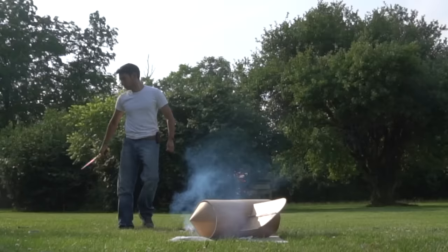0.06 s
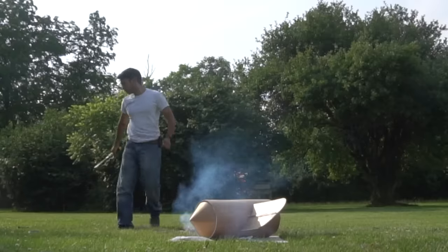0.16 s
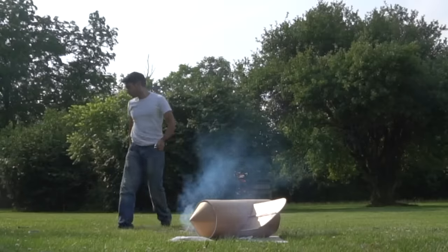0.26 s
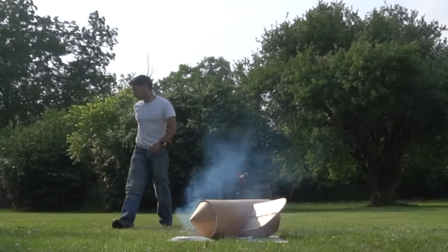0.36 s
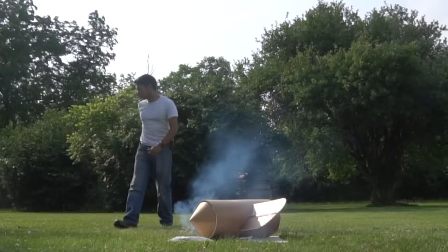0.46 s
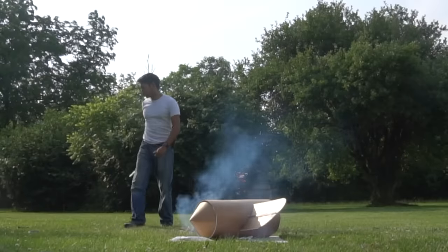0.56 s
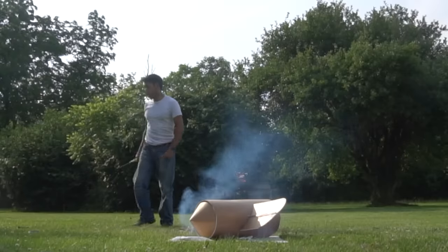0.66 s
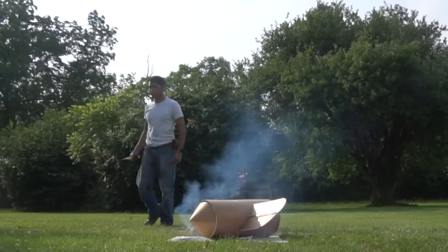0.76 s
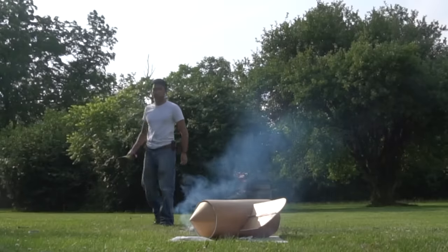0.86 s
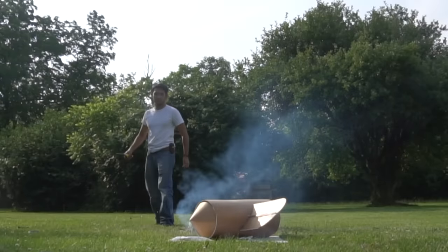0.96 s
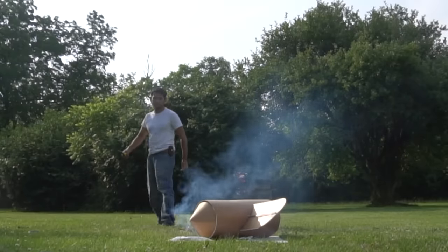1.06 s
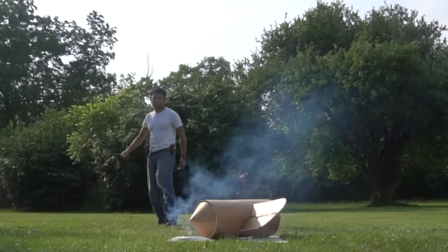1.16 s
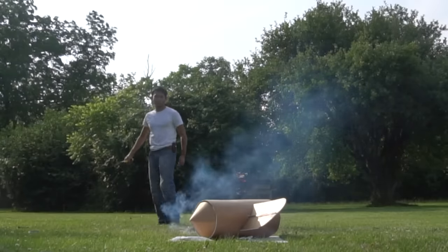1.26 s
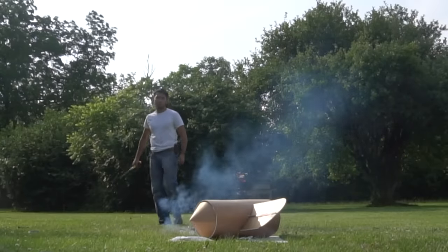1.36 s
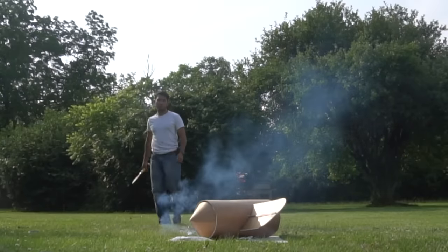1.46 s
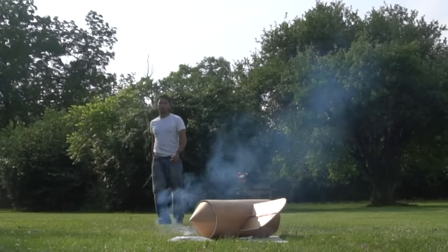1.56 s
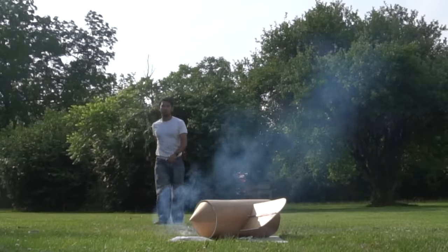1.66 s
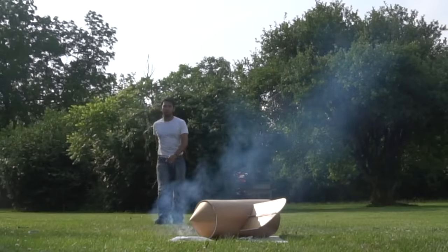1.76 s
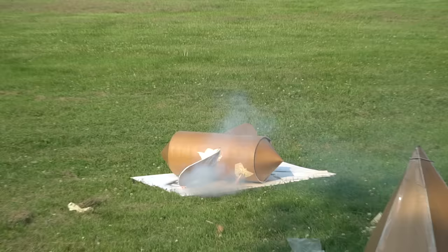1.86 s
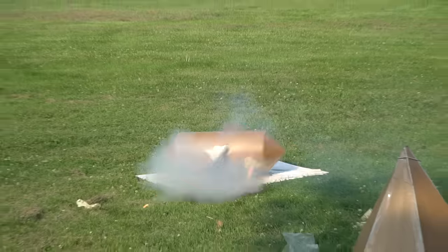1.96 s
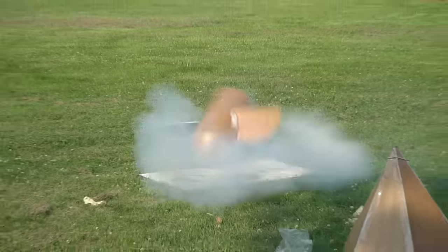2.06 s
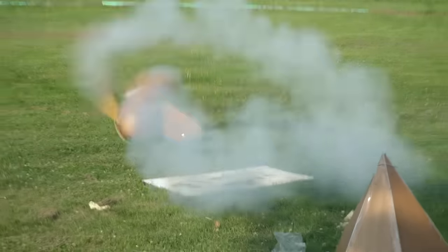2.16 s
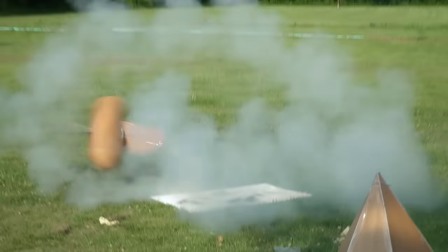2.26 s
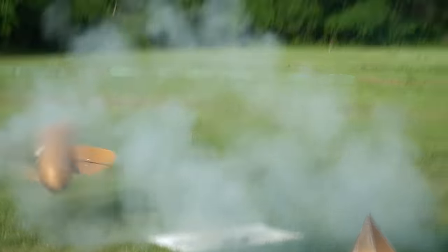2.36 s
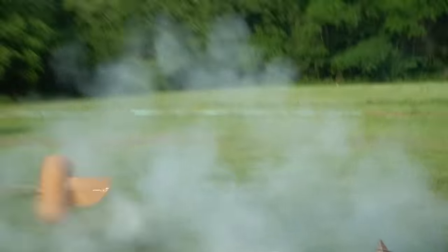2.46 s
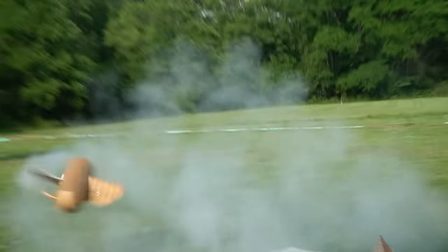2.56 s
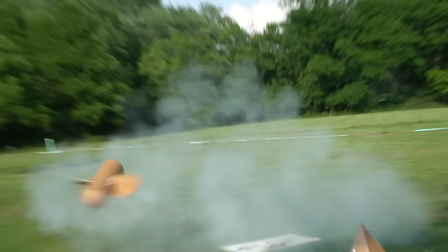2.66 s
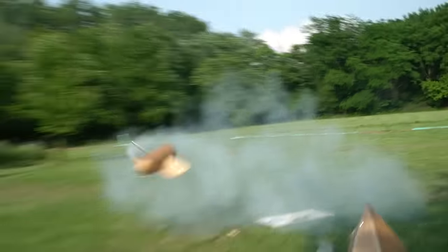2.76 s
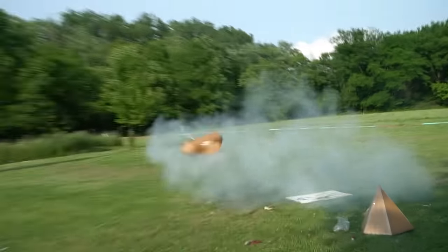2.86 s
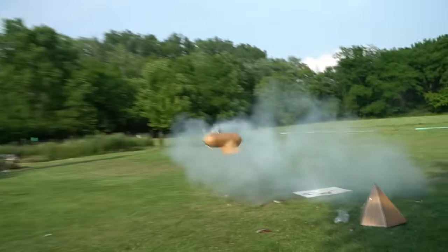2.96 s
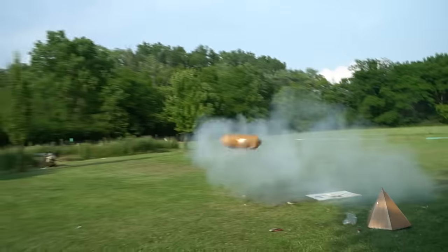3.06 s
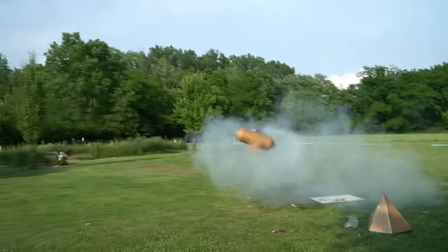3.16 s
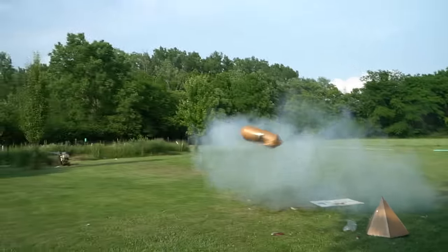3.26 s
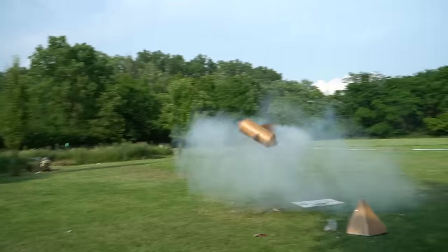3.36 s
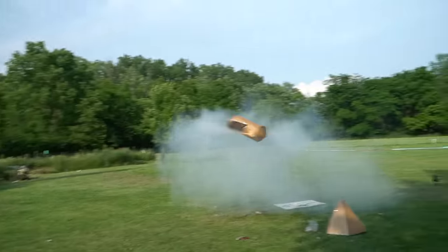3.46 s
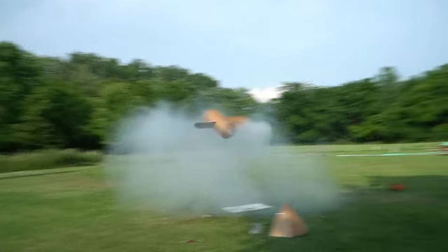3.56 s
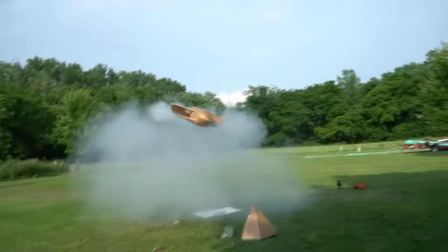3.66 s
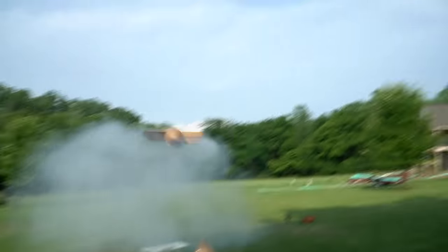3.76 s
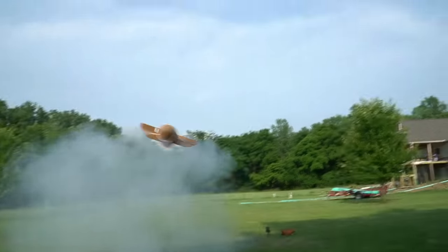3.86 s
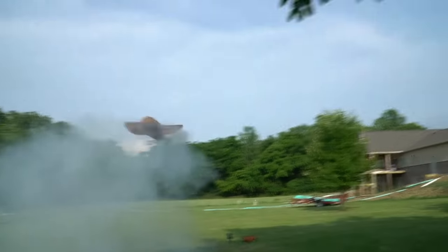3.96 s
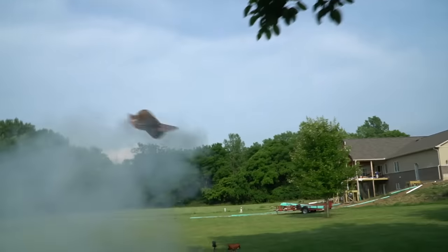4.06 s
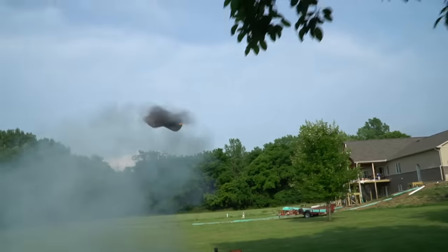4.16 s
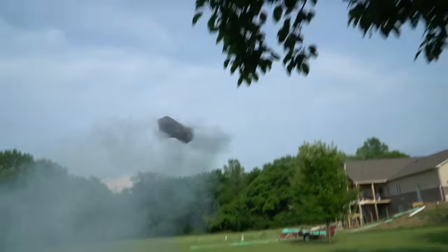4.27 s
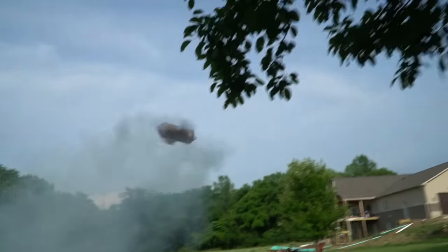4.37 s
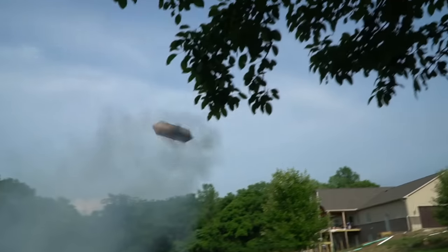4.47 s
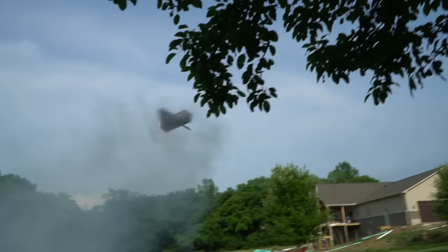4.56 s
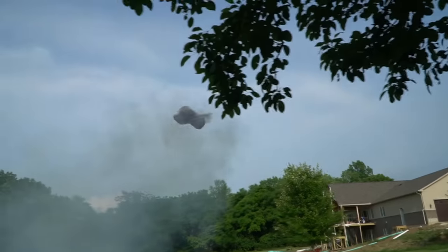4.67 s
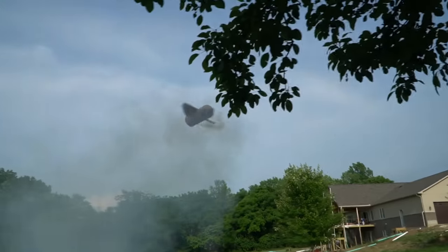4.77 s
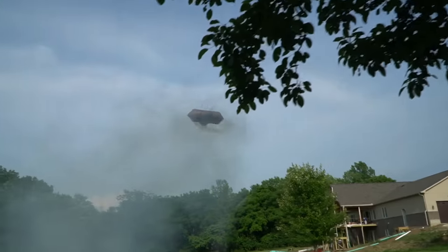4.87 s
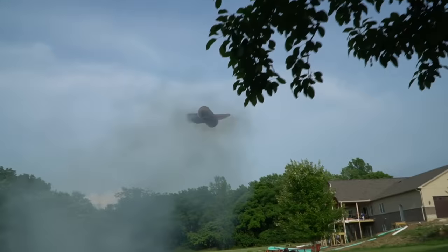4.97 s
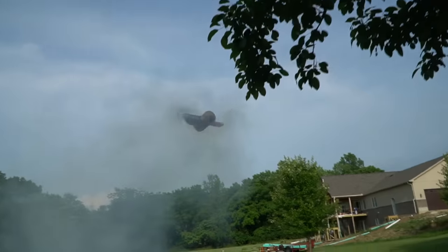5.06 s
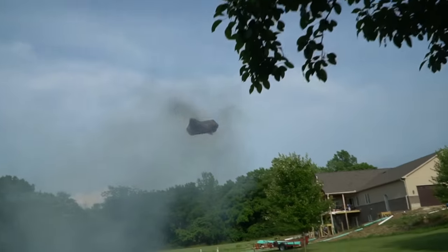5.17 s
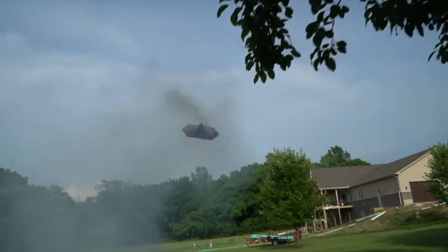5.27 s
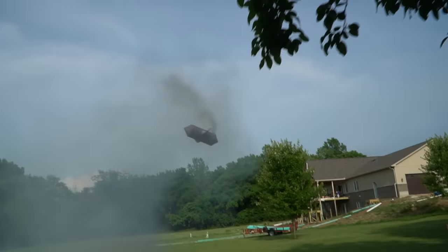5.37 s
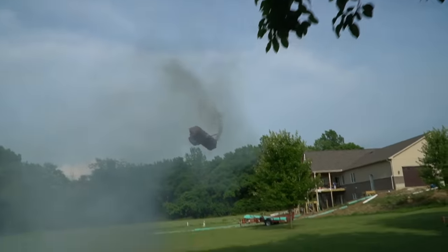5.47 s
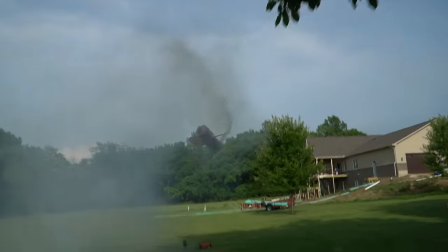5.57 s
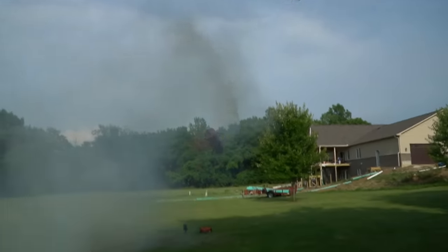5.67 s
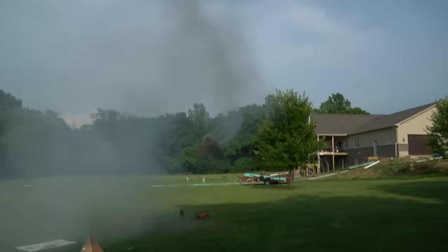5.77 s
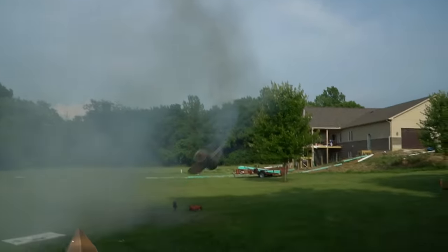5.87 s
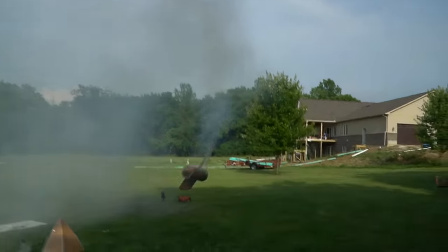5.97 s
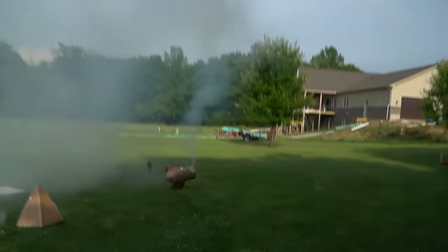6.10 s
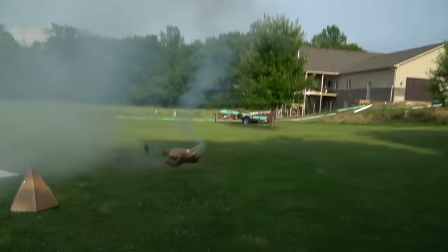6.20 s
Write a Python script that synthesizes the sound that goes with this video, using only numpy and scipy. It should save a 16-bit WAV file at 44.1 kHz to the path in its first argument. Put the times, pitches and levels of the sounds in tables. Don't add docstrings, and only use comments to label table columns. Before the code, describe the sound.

Quiet sputtering and low wind bumps jump abruptly to a loud, crackling jet roar whooshing round about five times a second, then faint hiss and a thud.

```python
import sys
import numpy as np
from scipy import signal
from scipy.io import wavfile
from scipy.ndimage import uniform_filter1d, map_coordinates

SR = 44100
rng = np.random.default_rng(int(sys.argv[2]) if len(sys.argv) > 2 else 0)


def field_ratio(decibels):
    return 10 ** (np.asarray(decibels, dtype=float) / 20)


def output_pcm(signal):
    pcm = np.clip(np.atleast_2d(signal).T, -1, 1) * 32767
    wavfile.write(sys.argv[1], SR, np.round(pcm).astype(np.int16))


N = 274910
T = np.arange(N) / SR
CUT_S, BURNOUT_S = 1.942, 4.517

# [t/s, level/dB, brightness/dB]
FUSE_BURN = [(0.03, -42.5, 1), (0.23, -44.5, 2.5), (0.36, -45.5, -2), (0.6, -45.5, 0.5), (0.76, -44.5, 1),
             (1.0, -46, -5), (1.33, -45.5, -1.5), (1.62, -48, -3.5), (1.9, -48.5, -2)]
# [f/Hz, level/dB per Hz]
FUSE_SPECTRUM = [(120, -3), (200, -4), (554, -2.5), (630, -3.5), (1280, -4), (1540, -2.5), (1780, -5),
                 (2800, -7.5), (3480, -8.5), (5300, -11.5), (6590, -17.5), (8050, -13.5), (10800, -21.5),
                 (13600, -14.5), (15500, -20)]
# [t/s, f/Hz, level/dB]
FUSE_COLOUR = [(0, 4700, 6), (.24, 4800, 7), (.33, 4200, -5), (.52, 3550, 3), (.84, 3600, 8),
               (.95, 4000, 0), (1.2, 4520, 2.5), (1.5, 4400, 2), (1.9, 4300, -8)]
# [t/s, lag/ms]
FUSE_LAG = [(0, 0.79), (.22, 0.85), (.32, 1.12), (.55, 1.14), (.85, 1.2), (1.0, 1.22), (1.3, 1.22),
            (1.94, 1.2)]
# [t/s, length/s, f/Hz, level/dB]
FLARES_BY_BURN = [
    [(.1, 0.16, 7240, 2), (.46, 0.054, 12500, 5), (.62, .12, 13500, 2), (.78, .07, 5970, 6.5), (.92, .04, 7500, 6.5), (1.3, 0.29, 8200, 5), (1.3, .2, 12800, 1.5)],
    [(4.7, 0.019, 12000, 4), (4.78, .03, 13000, 9), (5.13, 0.036, 7500, 2), (5.32, .08, 8000, 4.5), (5.58, 0.09, 8700, 8), (5.67, 0.035, 12500, 9), (5.92, .08, 8500, 2.5), (6.18, 0.033, 10900, 7)],
]
# [t/s, peak level/dB, centre f/Hz, length/ms]
SPIT_EVENTS = [
    (.012, -38, 497, 4.5),
    (.2, -39, 800, 4),
    (.327, -44, 9000, 4.2),
    (.405, -34, 546, 4.2),
    (.452, -34, 7350, 3),
    (.517, -33, 450, 4),
    (.612, -33, 580, 5.2),
    (1.979, -20, 4000, 1.2),
    (1.985, -13, 3540, 1.1),
    (5.228, -52, 900, 5.4),
]
# [t/s, peak level/dB, length/s]
GUSTS = [
    [(0.0, -29, 0.092), (.58, -33, 0.12), (.78, -30, 0.11), (.99, -24, 0.068), (1.15, -22, 0.075), (1.3, -26, 0.1), (1.43, -28, 0.018), (1.53, -28, 0.021), (1.74, -30, 0.081), (1.93, -39.5, 0.069)],
    [(5.08, -56, 0.073), (5.64, -50, 0.052), (5.83, -48, 0.056), (5.92, -43, 0.089), (6.12, -53, .04), (4.8, -48, 0.15)],
]
# [f/Hz, level/dB per Hz]
GUST_SPECTRA = [
    [(2.9, -32), (5.0, 8.5), (21, -6), (82, -19), (154, -26.5), (300, -31.5), (390, -58), (660, -120)],
    [(2.9, -34), (5.0, 5.5), (21, 0.5), (48, -13), (75, -11), (195, -24), (228, -26), (257, -34), (300, -26.5), (390, -57), (660, -120)],
]
# [f/Hz, level/dB per Hz]
JET_SPECTRUM = [(130, -44), (220, -14), (320, -7.5), (663, -4.5), (882, -6.5), (1300, -5.5), (1450, -1.5),
                (2000, 0), (2190, -2.5), (3180, -1), (6590, -5.5), (8770, -1), (10500, -10), (13900, -7),
                (15500, -14.5)]
# [place/turns, width/turns, level/dB, strongest f/Hz, slant/turns per octave]
BEAM_LOBES = [
    (0.01, 0.089, 11.5, 5530, -0.028),
    (0.283, 0.064, 5, 3700, 0.012),
    (0.828, 0.078, 1.7, 2090, 0.0066),
    (0.941, 0.016, -0.5, 5300, 0.0045),
    (.13, 0.068, 2.5, 1100, 0.013),
    (.43, .1, -5.5, 2800, -0.025),
]
# [t/s, f/Hz, level/dB]
LAUNCH_COLOUR = [(1.95, 5240, 5.5), (2.015, 4700, 7.5), (2.045, 1290, 2.5), (2.09, 995, 5.5),
                 (2.13, 800, -2.5), (2.15, 4470, 2.5), (2.23, 1900, 3), (2.3, 3170, 0.5), (2.39, 2300, 9.5)]
# [t/s, f/Hz, level/dB]
SHEET_CANCEL = [(1.95, 2600, -11), (2.03, 2550, -10), (2.08, 3300, -9), (2.125, 4150, -7), (2.14, 4400, -.1)]
# [t/s, place/turns, thrust/dB, brightness/dB per octave]
BREAK_LOOSE = [
    (1.942, -1.3, -9, 0.7),
    (1.975, -1.25, -4.5, 0.5),
    (2.01, -1.24, 1, 1.5),
    (2.09, -1.13, 1.5, -0.5),
    (2.126, -1.164, 2.2, -4.5),
]
# [t/s, level/dB, brightness/dB per octave, side lobe delay/s, side lobe level/dB]
SWEEPS = [(2.165, 3, -1.5, 0.079, -2), (2.32, -1.3, 0.7, 0.035, -1), (2.523, -1.2, 1.5, 0.045, 2.2),
          (2.73, -0.2, 0.4, 0.05, -0.2), (2.94, -1.8, 1.3, 0.057, 2), (3.153, 0.2, 0.5, 0.064, -0.5),
          (3.359, -2.2, -0.2, 0.086, -1.7), (3.576, 0.1, 0.8, 0.079, -0.8), (3.798, 1, 0.4, 0.07, -0.2),
          (4.009, 0.8, 1, .073, -0.7), (4.228, 1.1, 2.5, .069, 0), (4.443, 1.8, 3.8, 0.056, 6)]
# [t/s, lag/ms]
GRASS_LAG = [(1.94, 0.047), (2.2, 0.16), (2.65, 1.04), (3.2, 1.63), (3.76, 2.8), (4.32, 3.64), (4.55, 4.44),
             (5.1, 4.4), (5.43, 4.12), (5.71, 2.95), (6.24, 0.61)]
# [t/s, peak level/dB, direction/1, length/ms]
POP_EVENTS = [(2.182, -34, 1, 2.6), (2.434, -36, 0.81, 10), (2.518, -31.5, 0.71, 3.6),
              (2.951, -31, 0.52, 2.6), (3.143, -58, 0.85, 6.9), (3.365, -22.5, -1.5, 2), (3.9, -44, 1, 19),
              (4.014, -26, 1, 2.8), (4.1, -32, 0.53, 16), (4.229, -49, -0.44, 8.8), (4.497, -33, -1.1, 2.7)]
# [t/s, level/dB, brightness/dB]
SPENT_BURN = [(4.53, -22.5, 1.5), (4.6, -34.5, -6), (4.68, -46.5, 1.8), (4.84, -47, -4), (4.9, -52, -5),
              (5.03, -53, -12), (5.13, -54, -1.5), (5.6, -57, -3.2), (6.2, -56, -.6)]
# [f/Hz, level/dB per Hz]
SPENT_SPECTRUM = [(150, -48), (300, -13), (550, -13.5), (900, -8), (1300, -8.5), (2660, -7.5), (4760, -8),
                  (6000, -9), (7300, -8), (8670, -4.5), (9600, -11.5), (10800, -13.5), (13000, -14),
                  (15500, -20)]
# [t/s, f/Hz, level/dB]
SPENT_COLOUR = [(4.52, 231, 18), (4.6, 230, 23), (4.64, 330, -12), (4.9, 380, -7), (5.1, 380, -3),
                (5.65, 450, 5), (5.9, 460, .1)]
# [t/s, peak level/dB, f/Hz, 60 dB fade/s]
TURF_KNOCKS = [
    (6.205, -28, 300, 0.021),
    (6.2094, -24.5, 420, 0.038),
    (6.2132, -21.5, 506, 0.019),
    (6.215, -33, 1800, 0.022),
    (6.2155, -31, 1500, 0.0091),
    (6.2163, -34, 4000, .008),
    (6.2227, -20, 201, 0.037),
]


def evened(x):
    return x / np.sqrt(np.mean(x ** 2) + 1e-20)


def read(points, hz):
    f, value = np.transpose(points)
    return np.interp(np.log(hz + 1), np.log(f + 1), value)


def add(mix, s, sound):
    part = mix[round(s * SR):][:len(sound)]
    part += sound[:len(part)]


def frame_grid(size):
    return np.arange(4 * N // size + 5) * size / 4 / SR, np.fft.rfftfreq(size, 1 / SR)


def noise(field_db, size, patchy_db, flicker_db):
    real, imaginary, patches = rng.standard_normal((3, *field_db.shape))
    patches = uniform_filter1d(patches, size=12, axis=0)
    patches = evened(uniform_filter1d(patches, size=7, axis=1))
    flicker = evened(uniform_filter1d(rng.standard_normal((len(real), 1)), size=3, axis=0))
    spectra = (real + 1j * imaginary) * field_ratio(field_db + patchy_db * patches + flicker_db * flicker)
    sound = signal.istft(spectra.T, nperseg=size, noverlap=3 * size // 4)[1][:N]
    return sound * np.sqrt(3 / size)


def bump(rows, s, hz, octaves):
    at, peak_hz, peak_db = np.transpose(rows)
    off = np.log2((hz + 1) / np.interp(s, at, peak_hz)[:, None]) / octaves
    return np.interp(s, at, peak_db, right=0)[:, None] * np.exp(-off ** 2 / 2)


def band_mean_db(tone, hz, lo_hz, hi_hz):
    power = field_ratio(read(tone, hz)) ** 2
    return 10 * np.log10(np.mean(power * (hz > lo_hz) * (hz < hi_hz)))


def hiss(rows, tone, lo_hz, patchy_db, flicker_db, peak, peak_octaves, upper, top, flares):
    s, hz = frame_grid(size=256)
    at, body_db, bright_db = np.transpose(rows)
    field = read(tone, hz) - band_mean_db(tone, hz, lo_hz, 5500) + np.interp(s, at, body_db)[:, None]
    field += bump(peak, s, hz, octaves=peak_octaves)
    bright_share = read([(4500, 0), (7000, upper), (9000, upper), (11000, top)], hz)
    field += np.outer(np.interp(s, at, bright_db), bright_share)
    for when, length, flare_hz, db in flares:
        in_time = np.exp(-((s - when) / length) ** 2)
        in_pitch = np.exp(-(np.log2((hz + 1) / flare_hz) / 0.28) ** 2)
        field += db * np.outer(in_time, in_pitch)
    return noise(field, size=256, patchy_db=patchy_db, flicker_db=flicker_db)


def echoed(x, lag_ms, db, low_hz, soft_hz):
    dull = signal.lfilter(*signal.butter(1, [low_hz, min(soft_hz, 20000)], "band", fs=SR), x)
    late = map_coordinates(dull, [np.arange(N) - lag_ms * SR / 1000], order=3)
    return x + field_ratio(db) * late


def fuse():
    burn = hiss(FUSE_BURN, FUSE_SPECTRUM, 2000, patchy_db=0.7, flicker_db=.5, peak=FUSE_COLOUR,
                peak_octaves=.09, upper=0.82, top=0.17, flares=FLARES_BY_BURN[0])
    wander_ms = 0.034 * np.sin(11 * T + 1.6 * np.sin(27 * T))
    lag_ms = np.interp(T, *np.transpose(FUSE_LAG)) + wander_ms
    echo_db = -7.0 - 1.8 * np.cos(9 * T + 2.0 * np.sin(4 * T)) - 14 * np.clip(T - 1.45, 0, 1)
    once = echoed(burn, lag_ms, db=echo_db, low_hz=2800, soft_hz=16000)
    twice = echoed(once, .95 + .05 * T, db=-11, low_hz=3500, soft_hz=16000)
    return field_ratio(-1.8) * twice * (T < CUT_S)


def spits():
    out = np.zeros(N)
    for s, db, hz, ms in SPIT_EVENTS:
        puff = rng.standard_normal(size=600)
        puff = signal.lfilter(*signal.butter(2, [hz * .72, hz * 1.4], "band", fs=SR), puff)
        puff = puff[-int(ms * SR / 500):]
        add(out, s - ms / 1000, field_ratio(db) * evened(puff) * np.hanning(len(puff)))
    return out


def wind():
    s, hz = frame_grid(size=8192)
    first_on = np.clip((2.15 - T) * 20, 0, 1)
    second_on = np.clip((T - 4.5) * 2, .3, 1) * (T > 4.55)
    calm_dbs = -30.5, -51.5
    out = np.zeros(N)
    for rows, calm_db, tone, on in zip(GUSTS, calm_dbs, GUST_SPECTRA, (first_on, second_on)):
        field = np.tile(read(tone, hz) - 80 * (hz > 300), (len(s), 1))
        level = field_ratio(calm_db) + sum(field_ratio(db) * np.exp(-((T - at) / length) ** 2) for at, db, length in rows)
        out += evened(noise(field, size=8192, patchy_db=1.5, flicker_db=.1)) * level * on * .45
    return out


def spin(s):
    side_turn, away_turn = .3, .62
    rows = list(BREAK_LOOSE)
    ends = [row[0] for row in SWEEPS[1:]] + [2 * SWEEPS[-1][0] - SWEEPS[-2][0]]
    for k, ((at, db, bright, after, lobe_db), end) in enumerate(zip(SWEEPS, ends)):
        away = at + after + (end - at - after) * (away_turn - side_turn) / (1 - side_turn)
        aloft = away - SWEEPS[0][0]
        away_db = 1.5 + 11 * np.exp(-aloft / 0.2) - 1.5 * aloft
        rows.append((at, k - 1, db, bright))
        rows.append((at + after, k - 1 + side_turn, lobe_db, bright))
        rows.append((away, k - 1 + away_turn, away_db, bright))
    at, *columns = np.transpose(rows)
    return [np.interp(s, at, column) for column in columns]


def beam(turns, hz):
    power = field_ratio(-4.5) ** 2
    for turn, width, db, top_hz, slant in BEAM_LOBES:
        octaves = np.log2(np.clip(hz, 200, None) / top_hz)
        off = (turns[:, None] - turn - slant * octaves + .5) % 1 - .5
        narrowed = off / width * 2 ** (0.073 * octaves)
        power = power + field_ratio(db - 1.6 * octaves ** 2) ** 2 * np.exp(-narrowed ** 2)
    return 10 * np.log10(power)


def jet():
    s, hz = frame_grid(size=256)
    turns, thrust_db, bright = spin(s)
    octave = np.log2(np.clip(hz, 100, None))
    field = read(JET_SPECTRUM, hz) + beam(turns, hz) + thrust_db[:, None]
    field += np.outer(bright / 2, octave - 12)
    field += bump(LAUNCH_COLOUR, s, hz, octaves=0.65)
    field += bump(SHEET_CANCEL, s, hz, octaves=0.39)
    edge_hz = np.minimum(700 / np.interp(s, *np.transpose(GRASS_LAG)), 1000)
    under = np.clip(np.log2(edge_hz)[:, None] - octave, -.3, .9)
    field -= 8.0 * (under - .3) * np.clip((s[:, None] - 2.2) * 10, 0, 1) * (hz < 1500)
    roar = evened(noise(field, size=256, patchy_db=1.85, flicker_db=-0.98))
    crackle = evened(uniform_filter1d(rng.standard_normal(N), size=int(.6 * SR / 1000)))
    jumps = field_ratio(2.5 * crackle - 0.57) - 1
    roar += signal.sosfilt(signal.butter(3, 900, "high", fs=SR, output="sos"), roar * jumps)
    burning = np.clip((T - CUT_S) * 1500, 0, 1) * field_ratio(-2500 * np.clip(T - BURNOUT_S, 0, 1))
    return field_ratio(-15.5) * roar * burning


def buffet(turns):
    band = signal.butter(2, [25, 220], "band", fs=SR, output="sos")
    low = evened(signal.sosfilt(band, rng.standard_normal(N)))
    swept = np.exp(7.2 * (np.cos(2 * np.pi * (turns - .04)) - 1))
    return low * field_ratio(-57.0 + 20 * swept) * (T > CUT_S) * field_ratio(-400 * np.clip(T - 4.57, 0, 1))


def pops():
    out, t = np.zeros(N), np.arange(6000) / SR
    for s, db, sign, ms in POP_EVENTS:
        u = t / ms * 1000
        push = (1 - np.exp(-3.5 * u)) * (np.exp(-u) - 0.17 * np.exp(-u / 8.1))
        add(out, s, sign * field_ratio(db + 15.0) * push)
    return out


def afterburn():
    burn = hiss(SPENT_BURN, SPENT_SPECTRUM, 800, patchy_db=0.5, flicker_db=0.1, peak=SPENT_COLOUR,
                peak_octaves=0.45, upper=0.59, top=0.97, flares=FLARES_BY_BURN[1])
    return burn * (T > BURNOUT_S)


def sway():
    start_s, db, hz, t60_s, end_s = 4.551, -36, 10.7, 2.6, 5.2
    t = T - start_s
    return field_ratio(db - 60 * t / t60_s) * np.sin(2 * np.pi * hz * t) * (t > 0) * np.clip((end_s - T) * 8, 0, 1)


def landing():
    out, t = np.zeros(N), np.arange(1500) / SR
    for s, db, hz, t60 in TURF_KNOCKS:
        grit = min(hz / 1400, .6) * uniform_filter1d(rng.standard_normal(len(t)), size=5)
        add(out, s, field_ratio(db - 60 * t / t60) * (grit - np.sin(2 * np.pi * hz * t)))
    return out


def scene():
    turns = spin(T)[0]
    bob_ms = 0.079 * np.cos(2 * np.pi * (turns - .05)) * (T < BURNOUT_S)
    lag_ms = np.clip(np.interp(T, *np.transpose(GRASS_LAG)) + bob_ms, 0, None)
    flyer = echoed(jet(), lag_ms, db=-8.0, low_hz=59.5, soft_hz=1950)
    falling_echo_db = np.interp(T, [5.1, 5.7], [-8, -3.5])
    flyer += echoed(afterburn(), lag_ms, db=falling_echo_db, low_hz=500, soft_hz=6000)
    mix = fuse() + spits() + wind() + flyer + buffet(turns) + pops() + sway() + landing()
    return np.tile(mix, (2, 1))


def band_limit(x):
    return signal.sosfilt(signal.butter(12, 15830, fs=SR, output="sos"), x)


def record(dry):
    ceiling, knee = 0.45, 2.8
    held = dry / (1 + abs(dry / ceiling) ** knee) ** (1 / knee)
    held = signal.oaconvolve(held, signal.firwin(255, 15950, fs=SR)[None], "same")
    return band_limit(held)


dry = scene()
out = record(dry)
output_pcm(out)
```